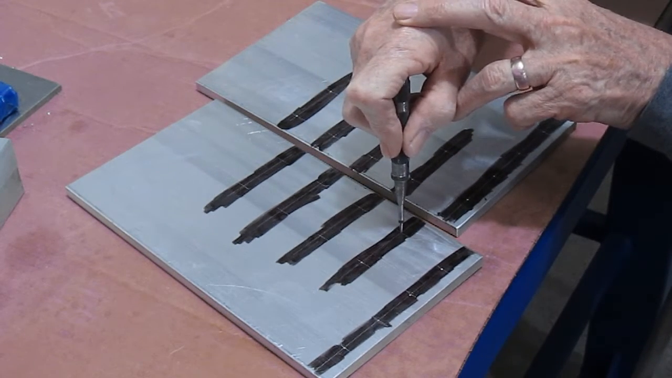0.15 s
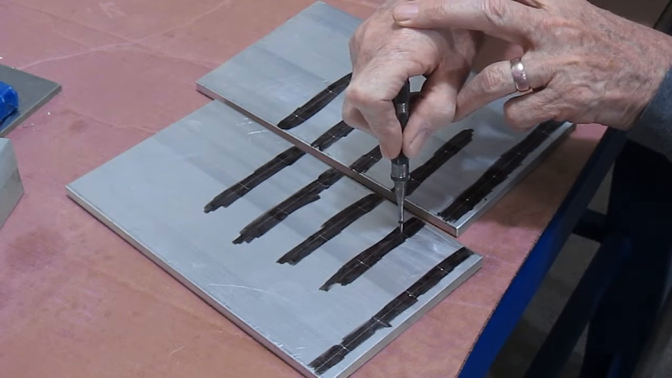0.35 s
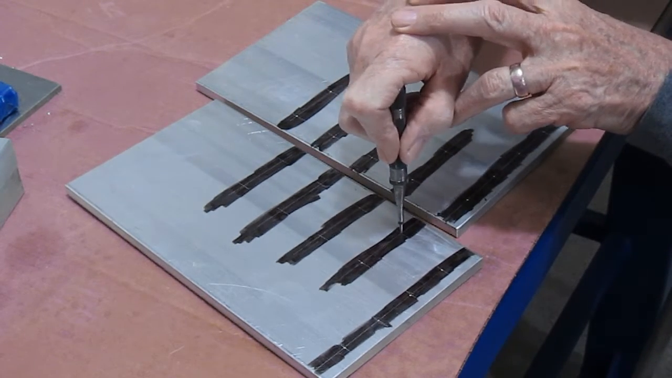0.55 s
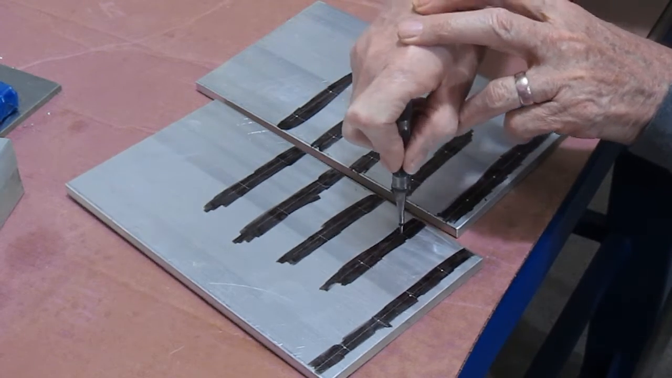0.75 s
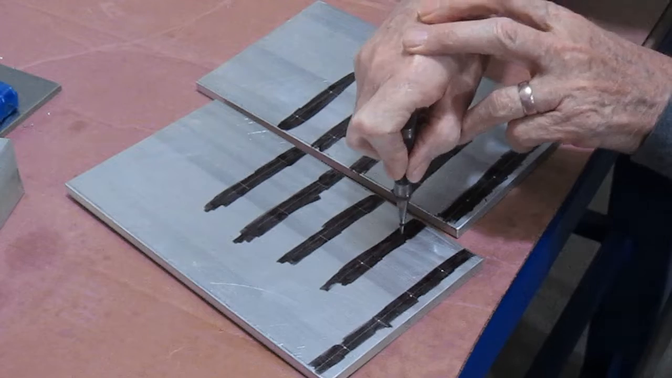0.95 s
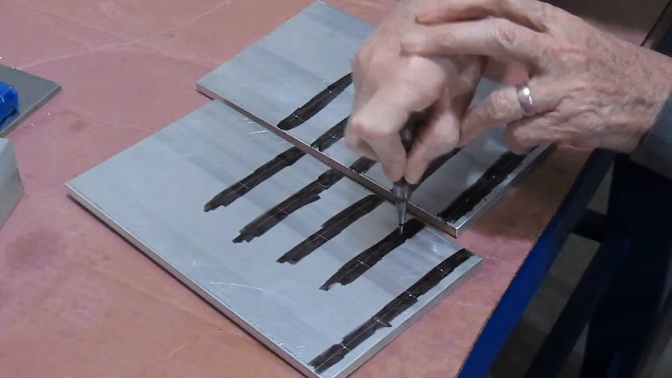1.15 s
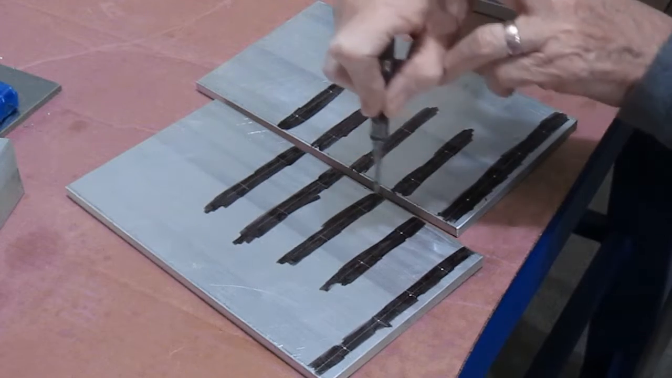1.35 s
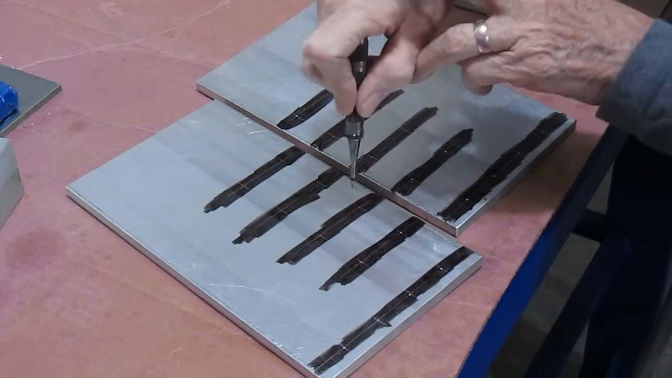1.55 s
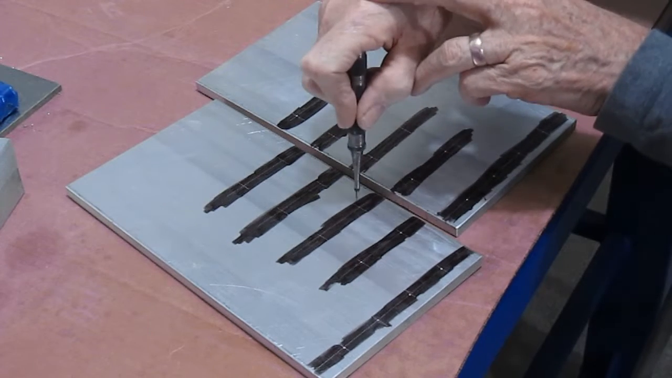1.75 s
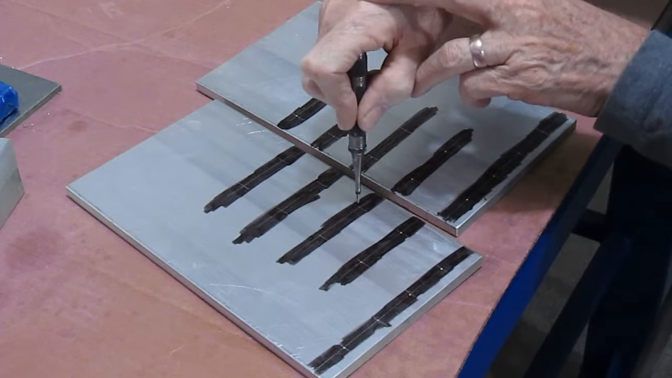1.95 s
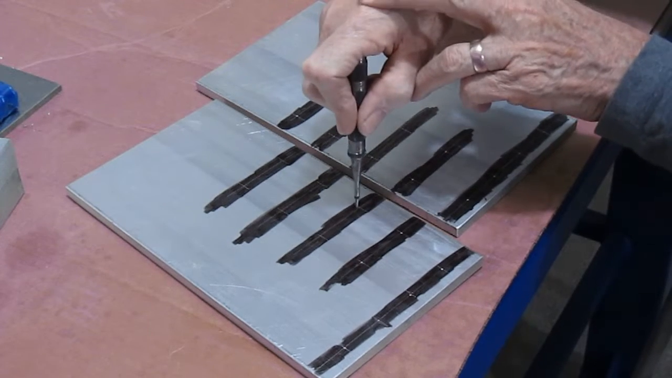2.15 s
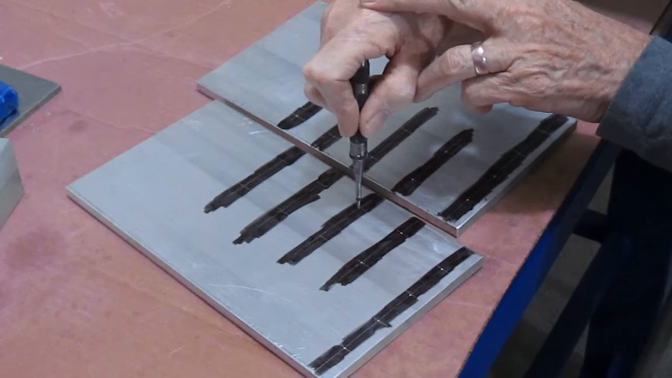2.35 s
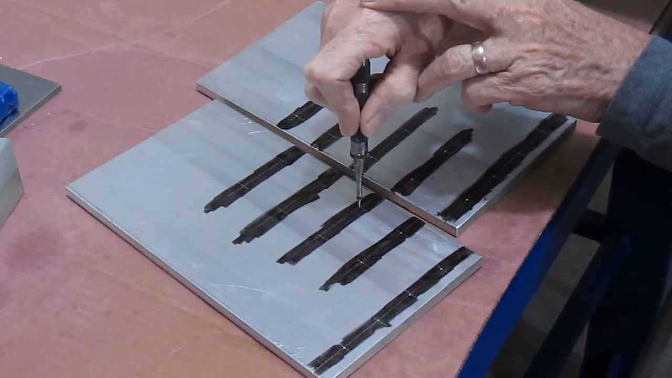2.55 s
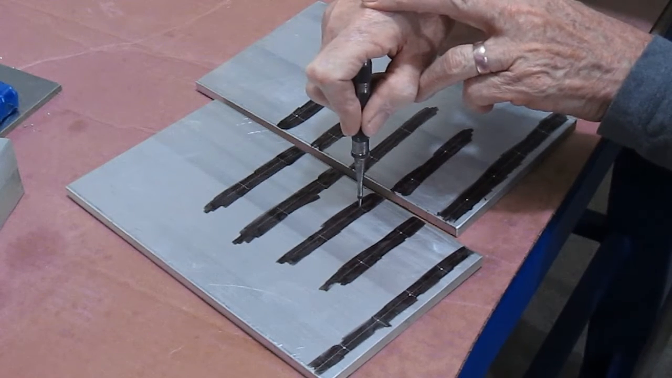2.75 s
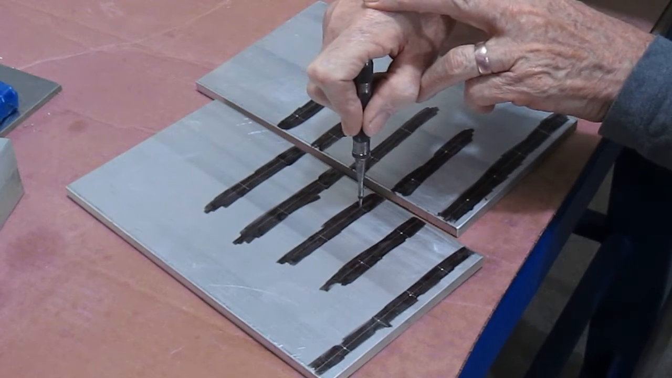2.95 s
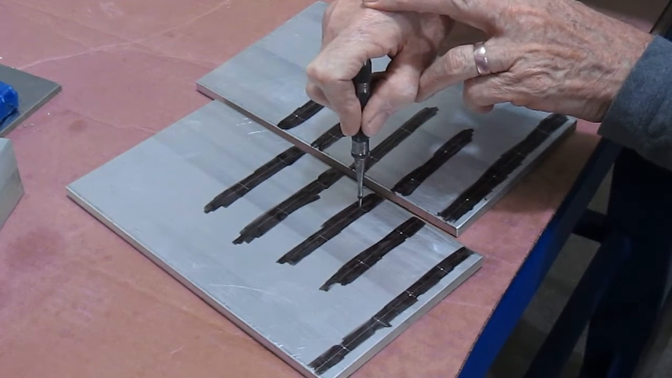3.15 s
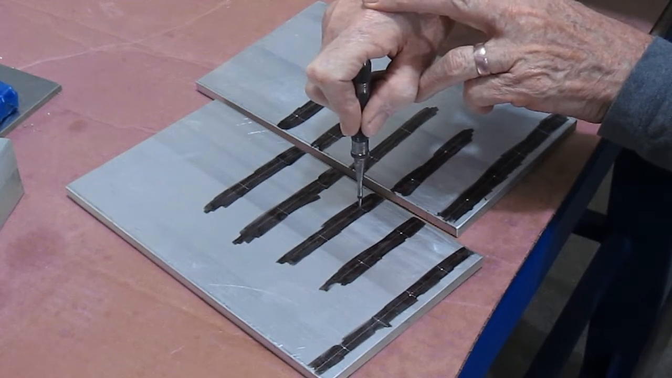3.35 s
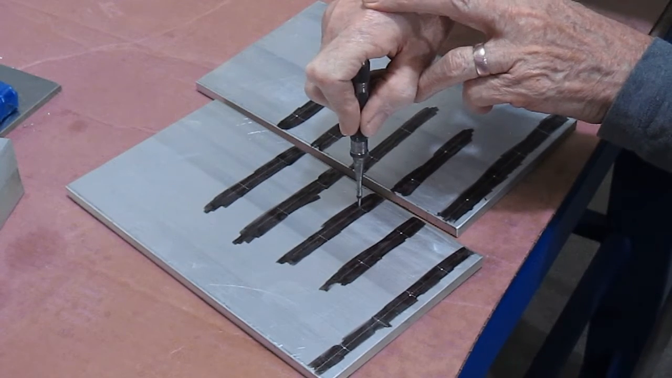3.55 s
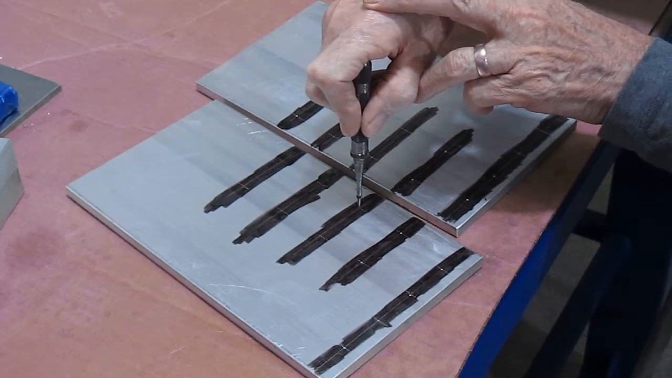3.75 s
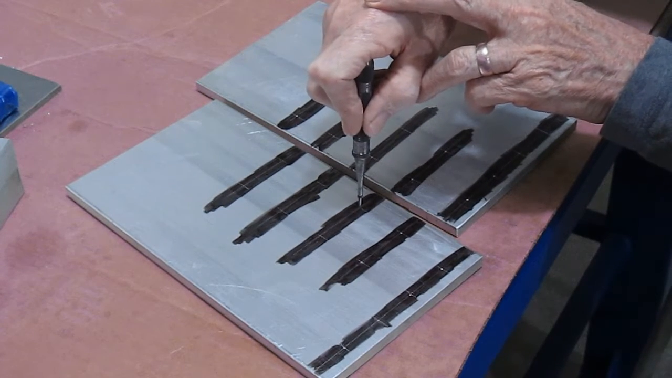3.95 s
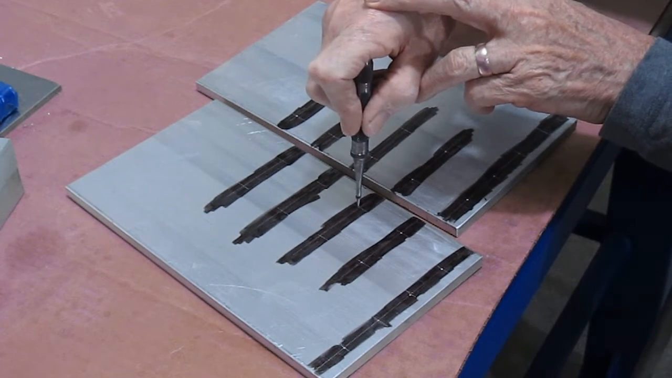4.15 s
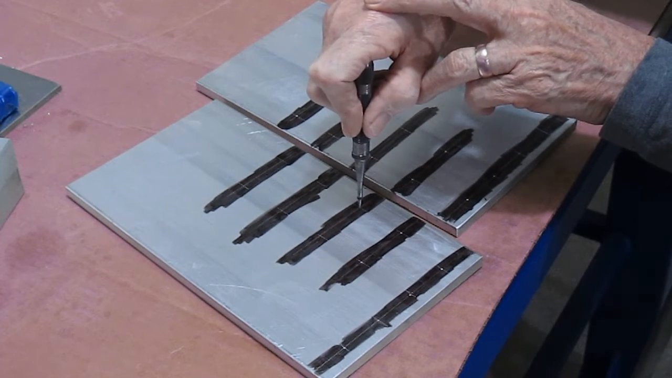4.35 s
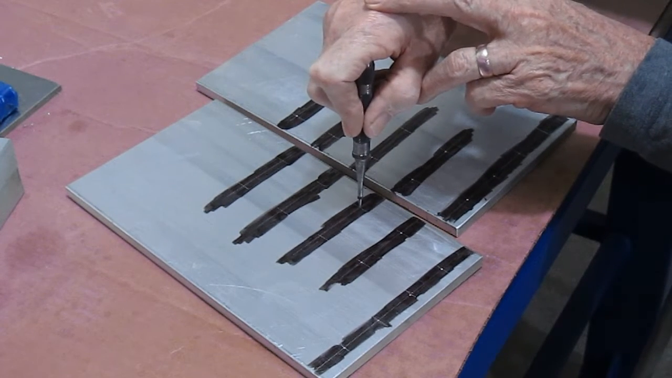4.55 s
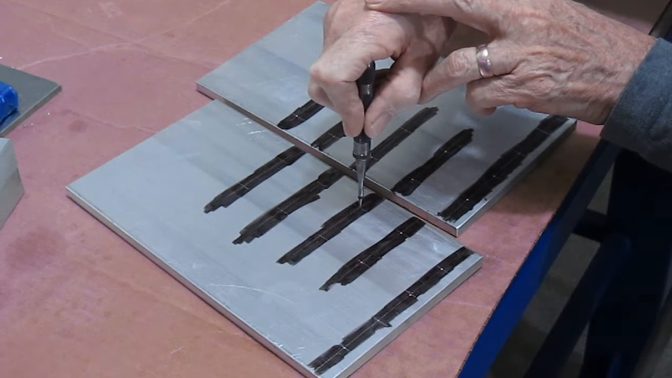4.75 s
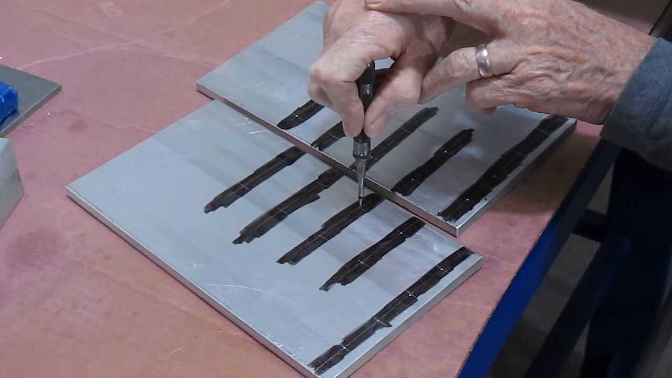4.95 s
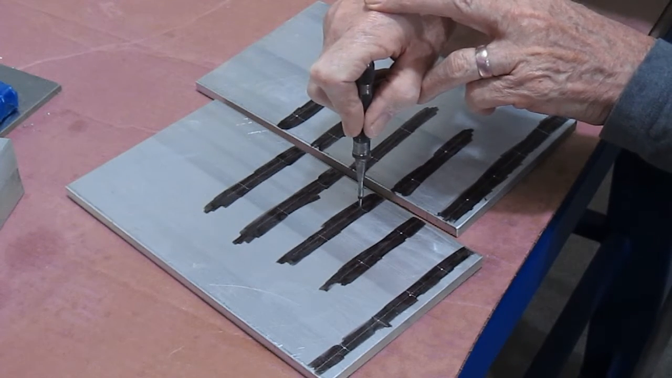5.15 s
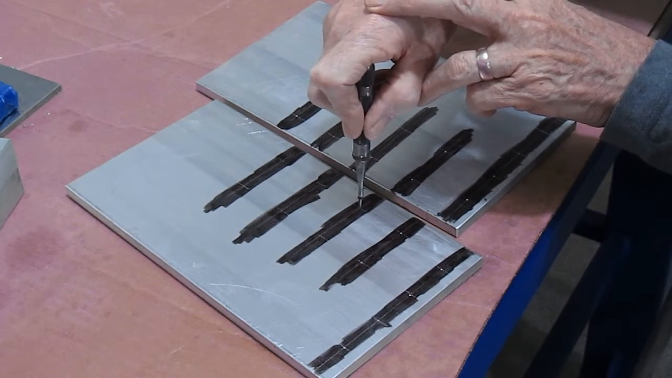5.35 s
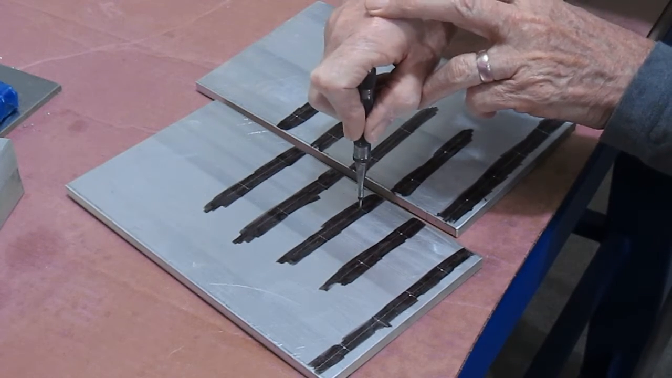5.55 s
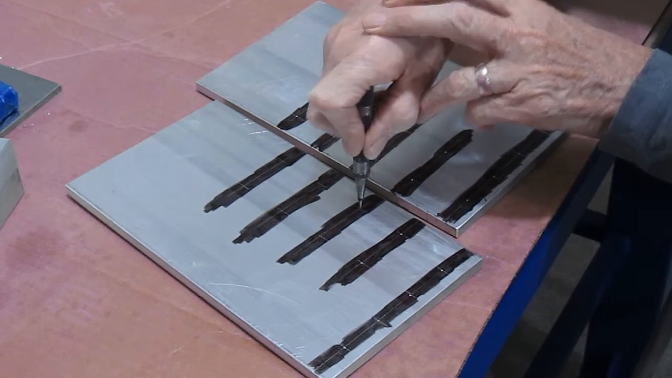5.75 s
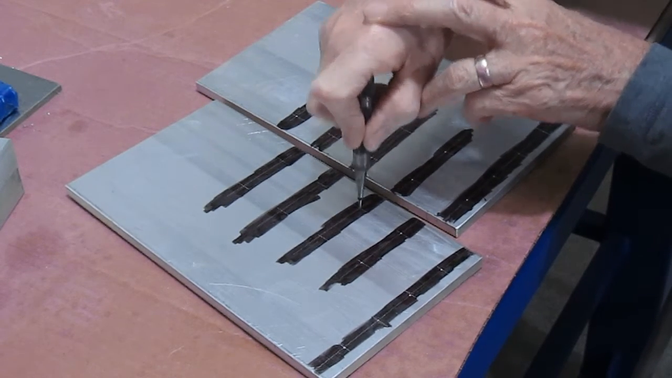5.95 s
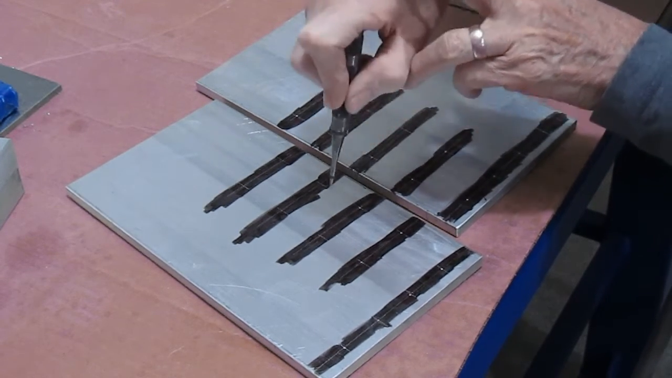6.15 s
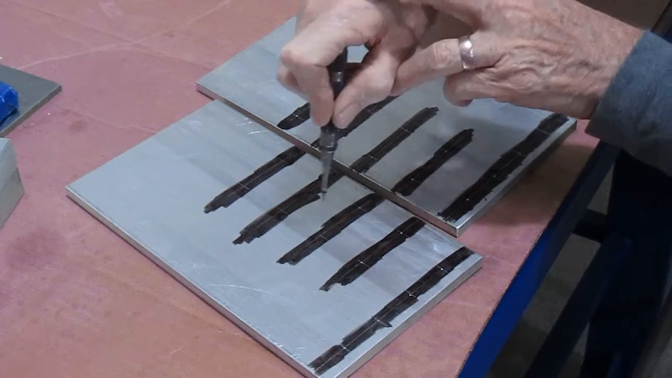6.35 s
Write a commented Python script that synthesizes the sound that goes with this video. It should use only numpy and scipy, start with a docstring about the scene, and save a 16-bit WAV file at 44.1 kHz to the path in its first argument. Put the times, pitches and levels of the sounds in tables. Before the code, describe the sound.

Two loud, sharp metallic snaps of a spring punch on an aluminium plate, several seconds apart, with faint taps and scrapes between in a workshop.

```python
"""An automatic centre punch is set on an aluminium plate on a workbench and pressed until it snaps, twice.
Each snap is hammer blows: a noise spike, a crack of dense resonances and plate modes, with a bench thud.
Before it the spring grinds, as uneven noise slips ringing the plate; after it the mechanism clicks back.
Light taps, ticks, scrapes and bumps come between, shaped from noise and decaying modes, in a diffuse room.
Gain control drops the level at each snap and lets it creep back over steady shop noise."""
import sys
import numpy as np
from scipy import signal
from scipy.fft import rfft, irfft
from scipy.io import wavfile
from scipy.ndimage import uniform_filter1d

SR = 44100
rng = np.random.default_rng(int(sys.argv[2]) if len(sys.argv) > 2 else 0)


def store_pcm(level_fs):
    """Save levels as 16-bit WAV."""
    pcm = np.round(np.clip(level_fs, -1, 1) * 32767).astype(np.int16)
    wavfile.write(sys.argv[1], SR, np.atleast_2d(pcm).T)


N = 286191
TIME = np.arange(N) / SR
AGE = TIME[:SR // 2]  # seconds since the start of one event
ONSET = 441  # samples (10 ms) over which the level of a hit is set

# Levels of events are rms, ahead of the gain control; spot runs from 0 (first) to 1 (second).
# Plate modes with the punch pressed on.
# Each row: frequency in Hz, relative level at the first spot in dB, at the second in dB, T60 in seconds.
PLATE_MODES = [(686, -15, -21, .12), (1495, -16, -8, .08), (1574, -23, -10, .1), (1700, -11, -7, .08),
               (1745, 3, 1, .06), (1807, -8, -11, .11), (1915, -16, -16, .08), (2253, -7, -12, .13),
               (2397, -16, -17, .09), (2638, 2, 3, .05), (2705, -7, 0, .065), (2850, -11, -4, .04),
               (3370, -11, -20, .11), (3745, -17, -19, .13), (5075, -28, -13, .15), (5145, -28, -13, .15),
               (5320, -21, -19, .13), (5807, 0, -3, .07), (6055, -15, -15, .08), (6195, 2, 3, .05),
               (6260, -9, -11, .08), (6656, -7, -6, .07), (6743, -5, -3, .1), (6893, -8, -12, .11),
               (8405, -22, -22, .16), (9075, -20, -18, .11), (9235, -26, -17, .12), (10670, -29, -29, .14),
               (11355, -26, -27, .15), (11850, -23, -34, .15)]
# Modes of plate and punch in light contact.
# Each row: frequency in Hz, relative level at the first spot in dB, at the second in dB, T60 in seconds.
LOOSE_MODES = [(677, 1.5, -7.5, 0.17), (1345.5, -13.5, 2, 0.0057), (1440, 0, -17.5, 0.05),
               (1775, -19.5, -7, .1), (1940, -18.5, -11.5, 0.078), (2210, -15, -11, 0.06),
               (2750, -1.5, -3.5, 0.11), (2780, -15.5, -4, 0.15), (3420, -6.5, -27, 0.23),
               (4550, -1.5, -24, 0.11), (5600, -10.5, -6, .1), (5900, -8, -9, 0.11), (6817, -6.5, -5, 0.14)]
# Colour of a tip tap. Each row: frequency in Hz, relative level in dB.
TAP_COLOUR = [(50, -14.5), (125, 5), (350, -11.5), (680, 9), (1100, -1), (1450, -1.5), (2000, -2.5),
              (4000, -17.5), (9000, -0.5), (15000, -18)]
# Colour of a bench bump. Each row: frequency in Hz, relative level in dB.
BUMP_COLOUR = [(50, -28.5), (120, -6.5), (170, 3.5), (200, 5), (240, -6.5), (320, -6.5), (550, -22.5),
               (2000, -37), (8000, -70)]
# Firings of the punch.
# Each row: start in seconds, level in dB, delay until the hand lets up in seconds,
# reset strength in dB, spot.
FIRINGS = [(1.0611, 7.5, .1855, -2, 0.04), (5.8269, 8, .1944, 1, 1)]


def undb(db):
    """Decibels to amplitude gain."""
    return 10 ** (np.asarray(db) / 20)


def unit(x, count=None):
    """Scale to rms 1 over the first count samples."""
    return x / np.sqrt(np.mean(x[:count] ** 2))


def at(points, hz):
    """Interpolate a (Hz, value) table on a log-frequency axis."""
    table_hz, value = np.transpose(points)
    return np.interp(np.log(np.maximum(hz, 1)), np.log(table_hz), value)


def colour(x, points):
    """Minimum-phase filter with the given (Hz, dB) response."""
    size = 4096
    gain = undb(at(points, np.fft.rfftfreq(size, 1 / SR)))
    cepstrum = irfft(np.log(gain))
    # fold the cepstrum to make the response causal
    cepstrum[1:size // 2] *= 2
    cepstrum[size // 2 + 1:] = 0
    response = irfft(np.exp(rfft(cepstrum)))
    return signal.fftconvolve(x, response)[:len(x)]


def soften(x, cutoff_hz):
    """Low-pass: a longer contact takes the treble away."""
    lowpass = signal.butter(2, min(cutoff_hz, SR * 4 / 9), fs=SR, output="sos")
    return signal.sosfilt(lowpass, x)


def fade(t, t60_s):
    """Exponential free decay, 60 dB in t60_s."""
    return np.exp(-np.log(1000) * t / t60_s)


def burst(body, t60_s):
    """Dense resonances that die together: coloured decaying noise."""
    noise = rng.standard_normal(len(AGE))
    return unit(colour(noise * fade(AGE, t60_s), body), count=ONSET)


def stroke(length_s):
    """Contact force that swells and lets go."""
    half_sine = np.sin(np.pi * np.minimum(AGE / length_s, 1))
    return np.sqrt(np.maximum(half_sine, 0))


def uneven_slips(grain_levels_db):
    """White noise with the level of each sample shifted by grain_levels_db."""
    return rng.standard_normal(len(AGE)) * undb(grain_levels_db)


def rub(length_s, body, grain_db):
    """A short stroke made of many tiny slips of uneven size."""
    slips = uneven_slips(grain_db * rng.standard_normal(len(AGE)))
    return colour(slips * stroke(length_s), body)


def spot_gain(first_db, second_db, spot):
    """Mode gains at a tip position between the two spots."""
    return undb(first_db + np.clip(spot, 0, 1) * (second_db - first_db))


def plate(modes, spot):
    """Ring of the plate; the place of the tip sets the strength of each mode."""
    hz, first_db, second_db, t60_s = np.transpose(modes)[:, :, None]
    phase = rng.uniform(0, 2 * np.pi, hz.shape)
    tones = fade(AGE, t60_s) * np.sin(2 * np.pi * hz * AGE + phase)
    return unit(np.sum(spot_gain(first_db, second_db, spot) * tones, axis=0), count=ONSET)


def add(track, start_s, sound):
    """Mix a sound in at start_s."""
    i = int(start_s * SR)
    track[i:i + len(sound)] += sound[:N - i]


def play(rows, sound, *shared):
    """One sound for each row, at the time in its first column."""
    out = np.zeros(N)
    for start_s, *own in rows:
        add(out, start_s, sound(*own, *shared))
    return out


def stereo(mid, side):
    """Left and right from mid and side."""
    return np.array([mid + side, mid - side])


def shop():
    """Wide, steady air noise, coloured apart in mid and side, with a thin sine whine."""
    # Noise common to both channels. Each row: frequency in Hz, relative density in dB.
    mid_colour = [(15, -48.5), (25, -21.5), (106, 1), (154, -1.5), (257, -1), (293, -4), (354, -2.5),
                  (438, -5), (903, -7), (2630, -16.5), (4040, -27), (4500, -23.5), (7680, -24),
                  (12800, -41.5), (15000, -64)]
    # Noise opposed between the channels. Each row: frequency in Hz, relative density in dB.
    side_colour = [(15, -58.5), (25, -23.5), (101, -5), (264, -2), (621, -11.5), (673, -13.5), (729, -13.5),
                   (2780, -28), (3930, -37.5), (5880, -35.5), (6900, -39), (7890, -75), (15000, -71)]
    mid_db, side_db = -55, -47.5
    whine_hz, whine_db = 4370, -80
    mid = undb(mid_db) * unit(colour(rng.standard_normal(N), mid_colour))
    side = undb(side_db) * unit(colour(rng.standard_normal(N), side_colour))
    whine = undb(whine_db) * unit(np.sin(2 * np.pi * whine_hz * TIME))
    return stereo(mid, side) + whine


def room_tail(build_s=0.0009):
    """Diffuse echoes that build up quickly, favour no pitch and die sooner in the treble."""
    # Room decay. Each row: frequency in Hz, T60 in seconds.
    room_t60 = [(120, 0.52), (700, .5), (2000, 0.4018), (6000, 0.3918), (14000, 0.17)]
    hz, t, cells = signal.stft(rng.standard_normal(SR), SR, nperseg=256)
    decaying = cells * fade(t, at(room_t60, hz)[:, None])
    tail = signal.istft(decaying, SR)[1][:SR]
    build_up = 1 - np.exp(-(TIME[:SR] / build_s) ** 2)
    spectrum = rfft(tail * build_up, 2 * SR)
    # flatten the smoothed spectrum
    local_power = np.convolve(np.abs(spectrum) ** 2, signal.windows.gaussian(121, 14), "same")
    tail = irfft(spectrum / np.sqrt(local_power))[:SR]
    return tail / np.sqrt(np.sum(tail ** 2))


def room(x):
    """The workshop's answer in both channels: convolution with independent mid and side tails."""
    # Width of the room. Each row: frequency in Hz, side minus mid in dB.
    side_colour = [(100, -9.5), (300, -18), (2000, -11.5), (6000, -11), (14000, -16)]
    responses = stereo(room_tail(), colour(room_tail(), side_colour))
    return signal.fftconvolve(x[None], responses, axes=1)[:, :N]


def bump(db, length_s):
    """A soft push stirs the low resonance of the bench."""
    push = rub(length_s, BUMP_COLOUR, grain_db=2.0)
    return undb(db) * unit(push, count=int(length_s * SR))


def fidget(span_s, db, count, spread_db=2.0):
    """Rows (s, dB) of faint chance events, one at random in each equal part of a span."""
    place, size = rng.uniform(0, 1, (count, 2)).T
    times_s = np.interp(np.arange(count) + place, [0, count], span_s)
    return list(zip(times_s, db + spread_db * (2 * size - 1)))


def scrape(db, length_s, cutoff_hz):
    """A brief rasp of coloured slips."""
    # Colour of the scrapes. Each row: frequency in Hz, relative level in dB.
    scrape_colour = [(150, -16), (450, 3), (1050, -2.5), (1750, 3), (2900, -0.5), (4000, -13), (4850, 1.5),
                     (5300, 1.5), (5850, -7.5), (8500, -11), (9650, -8), (10500, -24), (15000, -39.5)]
    rasp = soften(rub(length_s, scrape_colour, grain_db=0.5), cutoff_hz)
    return undb(db) * unit(rasp, count=int(length_s * SR))


def tick(db, t60_s, ring_db=-5):
    """The loose parts of the punch tick and stir its higher modes."""
    # Colour of the ticks. Each row: frequency in Hz, relative level in dB.
    tick_colour = [(300, -12), (2000, -0.5), (3600, -13.5), (4450, -0.5), (5200, -0.5), (7500, -4.5),
                   (9000, -3.5), (12000, -17.5), (16000, -34.5)]
    clink = unit(colour(plate(LOOSE_MODES, 0), tick_colour), count=ONSET)
    return undb(db) * (burst(tick_colour, t60_s) + undb(ring_db) * clink)


def tap(db, contact_hz, spot, t60_s=.055, ring_db=-5):
    """The tip knocks lightly on the plate: a damped burst and loose modes."""
    knock = burst(TAP_COLOUR, t60_s) + undb(ring_db) * plate(LOOSE_MODES, spot)
    return undb(db) * unit(soften(knock, contact_hz), count=ONSET)


def recoil(db):
    """A sudden shove makes the bench thud in its low modes."""
    # Bench-top modes. Each row: frequency in Hz, relative level in dB, T60 in seconds.
    bench_modes = [(134, -12, .06), (190, -0.5, 0.21), (262, -7, .14), (298, -8.5, .13)]
    hz, mode_db, t60_s = np.transpose(bench_modes)[:, :, None]
    tones = undb(mode_db) * fade(AGE, t60_s) * np.cos(2 * np.pi * hz * AGE)
    return undb(db) * unit(np.sum(tones, axis=0), count=ONSET)


def handling():
    """Taps, ticks, scrapes and bumps while the punch is moved to its next mark."""
    # The tip is set down. Each row: start in seconds, level in dB, contact cut-off in Hz, spot.
    taps = [(0.6063, -34.5, 3240, 0.2), (2.311, -45, 2363, 0.83), (4.2758, -39.5, 1460, 0.75),
            (5.5056, -39.5, 2790, 1)]
    # The sleeve ticks as the punch is moved. Each row: start in seconds, burst level in dB.
    ticks = [(.607, -65), (.7, -61), (1.575, -61), (1.929, -63.5), (2.445, -64), (3.917, -60.5),
             (4.292, -60.5), (4.408, -58.5)]
    # Short scrapes. Each row: start in seconds, level in dB, length in seconds, treble cut-off in Hz.
    scrapes = [(.735, -54, 0.045, 7300), (2.66, -56, 0.11, 2600), (2.929, -52.5, .027, 14000),
               (2.955, -48.5, 0.069, 2430), (3.02, -49.5, 0.038, 8950), (3.106, -47, 0.043, 11680),
               (3.212, -47.5, 0.046, 11800), (4.4955, -41.5, 0.037, 16050)]
    # The hands shift their weight on the bench. Each row: start in seconds, level in dB.
    bumps = [(3.52, -55), (3.915, -49.5), (4.125, -48), (4.36, -50), (4.665, -53), (5.36, -55.5)]
    tick_t60_s, bump_s, tap_thud_db = 0.05, 0.056, -14  # thud is relative to its tap
    chance_bumps = fidget(span_s=(2.7, 3.4), db=-51.5, count=3)  # while the punch is lined up
    metal = play(taps, tap) + play(ticks, tick, tick_t60_s)
    bench = play(bumps + chance_bumps, bump, bump_s)
    bench += play([(start_s, db + tap_thud_db) for start_s, db, *_ in taps], recoil)
    return metal, play(scrapes, scrape), bench


def grinding(grain_db=4.5, contact_hz=3000, jerk_db=2, release_t60_s=.2):
    """Stick and slip in the barrel grow as the spring is compressed; they reach plate and bench via the tip."""
    # The hand leans on the punch, twice before each snap.
    # Each row: start in seconds, length in seconds, final level in dB, spot.
    pushes = [(0.794, .055, -48, 0.2), (0.946, 0.091, -50, 0.8), (5.625, 0.092, -52.5, 0.96),
              (5.761, 0.073, -44.5, 0.9)]
    rise_db_per_s, bench_db = 75, 1  # bench relative to metal
    metal, bench = np.zeros(N), np.zeros(N)
    for start_s, length_s, final_db, spot in pushes:
        rise = undb(final_db - rise_db_per_s * np.maximum(length_s - AGE, 0))
        effort = rise * fade(np.maximum(AGE - length_s, 0), release_t60_s)
        jerks = unit(uniform_filter1d(rng.standard_normal(len(AGE)), size=900))  # 20 ms average
        slips = uneven_slips(grain_db * rng.standard_normal(len(AGE)) + jerk_db * jerks)
        ring = unit(signal.fftconvolve(slips, plate(PLATE_MODES, spot))[:len(AGE)])
        body = unit(colour(slips, TAP_COLOUR))
        add(metal, start_s, effort * unit(soften(ring + body, contact_hz)))
        add(bench, start_s, effort * undb(bench_db) * unit(colour(slips, BUMP_COLOUR)))
    return metal, bench


def long_ring(db, spot):
    """Plate modes that the bench hardly damps: faint tones that hang on after a snap."""
    # Each row: frequency in Hz, peak level at the first spot in dB re the snap level, at the second in dB.
    ring_modes = [(1489, -84.5, -61), (1560, -86, -60.5), (1766, -55.5, -55)]
    ring_t60_s = 3.3
    hz, first_db, second_db = np.transpose(ring_modes)[:, :, None]
    gain = undb(db) * spot_gain(first_db, second_db, spot)
    return np.sum(gain * np.sin(2 * np.pi * hz * TIME), axis=0) * fade(TIME, ring_t60_s)


def blow(db, contact_hz, spot, crack_db=-3, crack_t60_s=0.029, spike_db=-14, spike_t60_s=0.007):
    """Steel hits steel: a spike, a crack and the plate's modes."""
    # Dense short resonances of plate and bench. Each row: frequency in Hz, relative level in dB.
    crack_colour = [(50, -37), (170, 0), (420, -15), (700, 1.5), (1200, -9), (1750, -3), (2700, 2.5),
                    (3200, -2.5), (4000, -14), (4700, 0), (5500, 0), (6550, 7.5), (7600, -13.5),
                    (16000, -25)]
    # Colour of the plate ring under a blow. Each row: frequency in Hz, gain in dB.
    ring_colour = [(700, 0), (1500, 1), (1780, -0.5), (2300, 0), (2700, 2), (3400, 1.5), (5100, 1),
                   (6500, 0), (9000, 0), (12000, 0)]
    bright_noise = soften(np.gradient(rng.standard_normal(len(AGE))), 9500)
    spike = unit(bright_noise * fade(AGE, spike_t60_s), count=ONSET)
    ring = colour(plate(PLATE_MODES, spot), ring_colour)
    hit = ring + undb(crack_db) * burst(crack_colour, crack_t60_s) + undb(spike_db) * spike
    return undb(db) * unit(soften(hit, contact_hz), count=ONSET)


def snaps():
    """Latch trips; hammer strikes, rebounds, settles; hand lets up, latch resets, sleeve springs back."""
    # delays count from the hammer blow, levels are relative to it, Hz are contact cut-offs
    hammer_hz, recoil_db = 14000, -25.5  # bare steel on steel
    trip_lead_s, trip_db, trip_hz = .0018, -20, 3220
    rebound_s, rebound_db, rebound_hz = .0105, -8, 3050
    settle_s, settle_db = .0201, -20
    reset_db, reset_hz = -29, 7500  # reset_db and knock_db are further shifted by each firing's strength
    knock_db, knock_hz, thud_db = -34.5, 2500, -38.5
    return_s, return_db, return_t60_s = .2392, -38.5, 0.023
    metal, bench = np.zeros(N), np.zeros(N)
    for start_s, db, let_up_s, strength_db, spot in FIRINGS:
        add(metal, start_s - trip_lead_s, blow(db + trip_db, trip_hz, spot))
        add(metal, start_s, blow(db, hammer_hz, spot))
        add(bench, start_s, recoil(db + recoil_db))
        add(metal, start_s + rebound_s, blow(db + rebound_db, rebound_hz, spot))
        add(metal, start_s + settle_s, blow(db + settle_db, hammer_hz, spot))
        reset_at_s = start_s + let_up_s
        add(metal, reset_at_s, blow(db + strength_db + reset_db, reset_hz, spot))
        add(metal, reset_at_s, tap(db + strength_db + knock_db, knock_hz, spot))
        add(bench, reset_at_s, recoil(db + thud_db))
        add(metal, start_s + return_s, tick(db + return_db, return_t60_s))
    return metal, bench


def scene(punch_room_db=-6, scrape_room_db=-3, bump_room_db=-7):
    """The work lies straight ahead of the microphone, the room all around."""
    snap, shove = snaps()
    grind, strain = grinding()
    clicks, rasp, shifts = handling()
    punch = snap + grind + clicks
    thud = shove + strain + shifts
    ring = play([(start_s, db, spot) for start_s, db, *_, spot in FIRINGS], long_ring)
    room_feed = undb(punch_room_db) * punch + undb(scrape_room_db) * rasp + undb(bump_room_db) * thud
    return punch + ring + rasp + thud + room(room_feed) + shop()


def gain_control(x, limit_db=-7, range_db=16, recovery_db_per_s=3.5, start_cut_db=7):
    """Gain falls at once, as far as its range allows, when level passes the limit, then climbs slowly."""
    power = uniform_filter1d(np.mean(x ** 2, axis=0), size=44)  # 1 ms average
    level_db = 10 * np.log10(np.maximum(power, 1e-12))
    excess_db = np.clip(level_db - limit_db, 0, range_db)
    climb_db = recovery_db_per_s * TIME
    held_db = np.maximum.accumulate(excess_db + climb_db)
    cut_db = np.maximum(held_db, start_cut_db) - climb_db
    return x * undb(-cut_db)


def record(dry):
    """Gain control, clipping of the tallest peaks, and a steep top cut."""
    top_hz = 16000
    clipped = np.clip(gain_control(dry), -1, 1)
    top_cut = signal.ellip(8, .2, 70, top_hz, fs=SR, output="sos")
    return signal.sosfilt(top_cut, clipped)


dry = scene()
out = record(dry)
store_pcm(out)
```